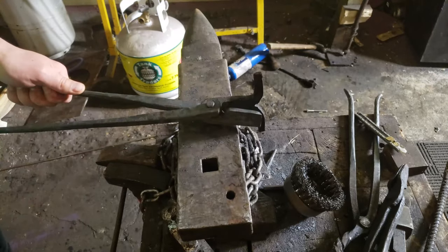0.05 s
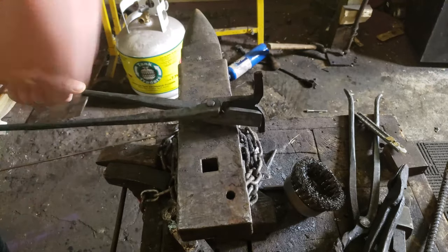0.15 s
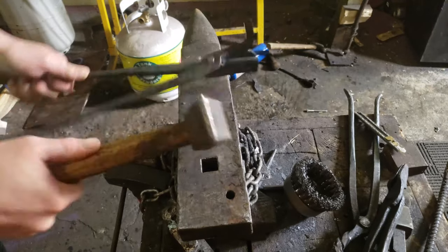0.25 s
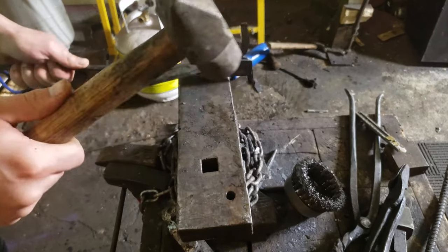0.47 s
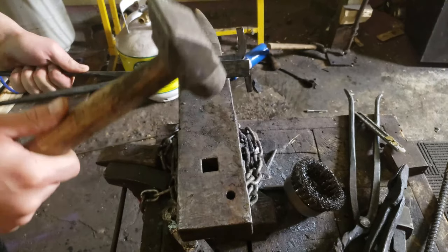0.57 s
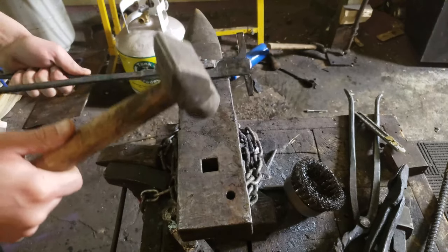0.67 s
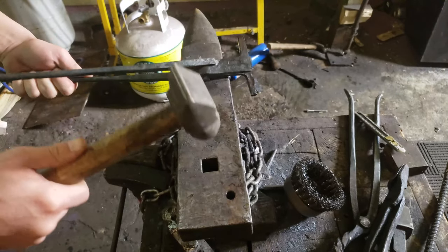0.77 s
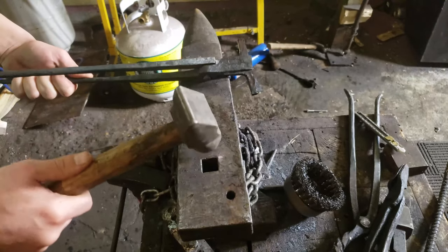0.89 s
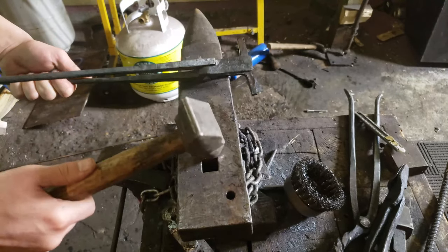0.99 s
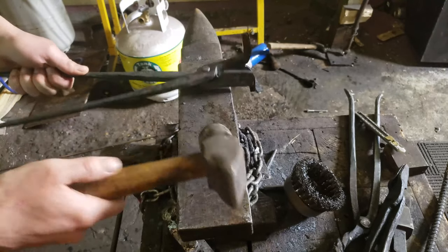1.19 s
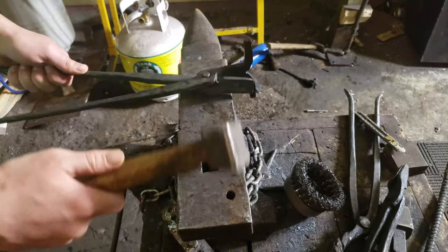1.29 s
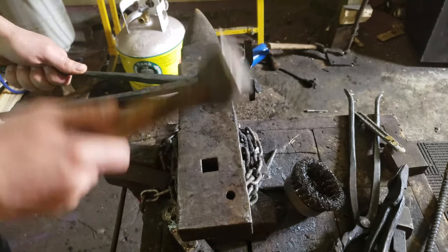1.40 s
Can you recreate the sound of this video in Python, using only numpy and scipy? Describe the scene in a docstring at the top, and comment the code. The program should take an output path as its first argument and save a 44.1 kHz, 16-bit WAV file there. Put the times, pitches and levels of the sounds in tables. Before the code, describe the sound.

One close hammer blow cracks on a steel anvil, which rings high and clatters briefly. After a short pause, the hammer settles on the anvil in light taps that speed up and fade, while the workshop rumbles low.

```python
"""A low rumble fills a workshop, and an anvil still sings high from the blow before.
A smith's hammer hits it once, hard and close: a crack, a thump and ringing steel, then two quick clatters.
A limiter clamps on the blow and holds the level down to the end.
Then the hammer is let down on the anvil's face and bounces to rest in quickening ticks."""
import sys
import numpy as np
from scipy import signal
from scipy.fft import rfft, irfft
from scipy.io import wavfile
from scipy.ndimage import uniform_filter1d

SR = 44100
rng = np.random.default_rng(int(sys.argv[2]) if len(sys.argv) > 2 else 0)


def materialize(psi):
    """Save the field psi as 16-bit PCM at rate SR to the path in sys.argv[1].

    A 1-D psi becomes a single channel; in a 2-D psi each row is a channel.
    """
    bounded = np.clip(np.atleast_2d(psi).T, -1, 1)
    quanta = np.round(bounded * 32767).astype(np.int16)
    wavfile.write(sys.argv[1], SR, quanta)


N = 63945


def amp(db):
    """Decibels to gain."""
    return 10 ** (np.asarray(db) / 20)


def unit_rms(x):
    """Scales to rms 1."""
    return x / np.sqrt(np.mean(x ** 2) + 1e-20)


def curve(table, hz, column=1):
    """Reads one column of a table on a log-frequency axis."""
    columns = np.transpose(table)
    return np.interp(np.log(hz + 1), np.log(columns[0] + 1), columns[column])


def add(mix, start_s, sound):
    """Mixes a sound in at a time."""
    part = mix[:, round(start_s * SR):][:, :sound.shape[-1]]
    part += sound[..., :part.shape[1]]


def pan(db):
    """Stereo gains; positive db leans left."""
    return amp([[db / 2], [-db / 2]])


def ripple(hz, width_hz):
    """Many small resonances: random peaks and dips along frequency."""
    return np.interp(hz / width_hz, np.arange(4096), rng.standard_normal(4096))


def noise(eq, size, ripple_db=0):
    """Two unrelated channels of coloured noise at rms 1."""
    hz = np.fft.rfftfreq(size, 1 / SR)
    gain = amp(curve(eq, hz) + ripple_db * ripple(hz, width_hz=44.35))
    return unit_rms(irfft(rfft(rng.standard_normal((2, size))) * gain, size))


def ring(modes, t, tilt_db=0, tilt_from_hz=1920):
    """Decaying modes; harder or softer contact tilts the highs by tilt_db per octave."""
    hz, db, t60 = np.transpose(modes)[:, :, None]
    phase = np.array([1, -1]) * np.pi / 4 * np.minimum(hz / 5500, 1)  # highs: a quarter cycle of width
    gain = amp(db + tilt_db * np.log2(np.maximum(hz / tilt_from_hz, 1))) * np.exp(1j * phase)
    return (gain.T @ np.exp((2j * np.pi * hz - np.log(1000) / t60) * t)).imag


# Tone of the workshop bed: freq_hz, level_db
RUMBLE_EQ = [(20, -41), (40, -41.5), (58, -3), (85, -3), (120, -30), (170, -1.5), (215, -10.5), (335, 1.5),
             (420, -6), (500, -17), (700, -24.5), (1000, -39), (1230, -25), (1500, -40), (2500, -32.5),
             (3200, -39), (6500, -42), (8800, -53.5), (10000, -46.5), (12600, -42), (15500, -45.5)]
# Its stereo image: freq_hz, correlation, pan_db
RUMBLE_IMAGE = [(60, 0.98, 1), (170, 0.91, 1), (352, 0.74, 3.5), (1000, 0.12, 2), (4000, 0.11, 7.5),
                (11900, 0.046, -2.5)]


def rumble(level_db=-36, flutter_db=2, ripple_db=5):
    """A steady low roar with faint hiss, fluttering in patches."""
    hz = np.fft.rfftfreq(2048, 1 / SR)
    a, b, c, d, flutter = rng.standard_normal((N // 512 + 5, len(hz), 5)).T
    flutter = uniform_filter1d(flutter, size=8, axis=0)  # smooth across frequency
    flutter = unit_rms(uniform_filter1d(flutter, size=6, axis=1))  # and over time
    correlation = np.clip(curve(RUMBLE_IMAGE, hz), -1, 1)[:, None]
    pan_db = curve(RUMBLE_IMAGE, hz, column=2)[:, None]
    left = a + 1j * b
    right = correlation * left + np.sqrt(1 - correlation ** 2) * (c + 1j * d)
    bands = np.array([left * amp(pan_db / 2), right * amp(-pan_db / 2)])
    eq_db = curve(RUMBLE_EQ, hz) + ripple_db * (hz > 450) * ripple(hz, width_hz=40)
    bands *= amp(eq_db[:, None] + flutter_db * flutter)
    return amp(level_db) * unit_rms(signal.istft(bands, nperseg=2048, noverlap=1536)[1][:, :N])


# Reverb time of the workshop: freq_hz, t60_s
ROOM_DECAY = [(200, 0.13), (1500, 0.38), (4000, 0.29), (8000, 0.324), (15000, 0.23)]


def room(send):
    """Sparse reflections, each band dying at its own speed."""
    taps = rng.choice([-1., 1.], (2, SR // 2)) * (rng.random((2, SR // 2)) < .1)
    taps[:, :round(.005 * SR)] = 0  # pre-delay
    hz, t, bands = signal.stft(taps, SR, nperseg=256)
    decay = np.exp(-np.log(1000) * t / curve(ROOM_DECAY, hz)[:, None])
    tail = signal.istft(bands * decay, SR, nperseg=256)[1]
    return signal.fftconvolve(send, tail / np.linalg.norm(tail[0]), axes=1)[:, :N]


# The anvil's high note, three close modes that beat: pitch_hz, level_db, t60_s
SINGING_MODES = [(8358, -11, .24), (8390, -27, .6), (8393.4, -30, .6)]


def anvil_singing(earlier_s=0.21):
    """The high note lingers from the blow before and is struck afresh."""
    t = np.arange(N) / SR
    out = amp(-9) * ring(SINGING_MODES, t + earlier_s) * pan(1.7)
    add(out, HARD_HITS[0][0], amp(3.5) * ring(SINGING_MODES, t))
    return out


# Clack of the hammer against the face, in bounces and hard hits: pitch_hz, level_db, t60_s
HAMMER_MODES = [(747, -7, 0.038), (1439, -4.5, 0.019), (1602, 5, 0.019), (1690.5, -12.5, 0.13),
                (2556, 0, 0.048), (2644, -4.5, 0.024), (3514, -13.5, 0.024), (5075, -17.5, 0.022),
                (6010, -17, .025), (8760, -36.5, .05)]
# Tone of a light tick: freq_hz, level_db
TICK_EQ = [(200, 8.5), (700, 7.5), (1100, 5.5), (1600, 13), (2800, 1.5), (4000, -8), (7500, -10.5),
           (9000, -16.5), (12500, -14), (15500, -11)]
# The hammer settling: start_s, level_db, tick_trim_db, tilt_db_per_octave
BOUNCE_HITS = [(0.8551, -0.5, 0.5, 3.5), (0.9515, -1.5, -3, 0.5), (1.0018, -4.5, -1, -7.5),
               (1.0347, -6, 1.5, -10), (1.0577, -11, 4, -9), (1.0735, -7.5, -4.5, -26),
               (1.086, -11, -2, -10.5), (1.093, -23, -22, -23)]


def hammer_bounces(attack_s=0.0014, tick_decay_s=0.0019, reverb_db=-9):
    """The hammer drops on the face and bounces ever faster as it fades."""
    t, out = np.arange(SR // 10) / SR, np.zeros((2, N))
    for start_s, level_db, trim_db, tilt_db in BOUNCE_HITS:
        tick = amp(trim_db - 13.5) * np.exp(-t / tick_decay_s) * noise(TICK_EQ, len(t))
        clack = amp(-21.5) * ring(HAMMER_MODES, t, tilt_db)
        add(out, start_s, amp(level_db) * np.minimum(t / attack_s, 1) * (tick + clack))
    return pan(7) * (out + amp(reverb_db) * room(out))


# Knock of the anvil's stand: pitch_hz, level_db, t60_s
STAND_MODES = [(779, 10, 0.019), (338, -8.5, 0.098), (139, -8.5, 0.033)]


def thump(push_delay_s=0.0013, push_s=0.00049, swing_hz=53, swing_s=0.029):
    """The blow knocks the stand and throws a push of air that swings the near microphone."""
    t, out = np.arange(SR // 10) / SR, np.zeros((2, N))
    push = amp(22) * np.exp(-((t - push_delay_s) / push_s) ** 2)
    swing = -amp(4) * np.sin(2 * np.pi * swing_hz * t) * np.exp(-(t / swing_s) ** 4)
    air = (push + swing) * np.array([[1], [-.17]])  # weak and inverted on the right
    knock = amp(-6) * pan(10.5) * ring(STAND_MODES, t)
    add(out, HARD_HITS[0][0], air + knock)
    return out


# Ring of the anvil's body: pitch_hz, level_db, t60_s
ANVIL_MODES = [(1497, -23, .25), (1898, -26, .22), (2526, -24, .3), (3735, -27, .22), (4337, -19, .24),
               (4447, -24, .22), (7217, -24, .24), (7653, -25, .22), (9458, -29, .26), (12284, -31, .34),
               (14970, -22, .15), (15260, -15, .08)]
# Tone of the crack and the jangle: freq_hz, level_db
CRACK_EQ = [(100, -0.5), (400, 7.5), (800, -0.5), (1100, -0.5), (2400, 2), (3100, 0), (4400, 4),
            (6200, -2.5), (7600, 4), (9000, -1.5), (12500, -2.5), (13800, -3), (15300, 0)]
# The blow and its two clatters: start_s, crack_db, ring_db, clack_db, pan_db
HARD_HITS = [(0.2316, 6.5, -3, -10.5, 4), (0.2625, -13.5, -15, -1.5, 7), (0.2918, -8.5, -22.5, -28, 3)]


def hammer_blow(attack_s=0.00048, crack_decay_s=0.0034, jangle_t60_s=0.36, reverb_db=-7.5):
    """Each hard contact cracks, rings anvil and hammer, and sets tongs, chain and loose steel jangling."""
    t, hits, tails = np.arange(SR // 2) / SR, np.zeros((2, N)), np.zeros((2, N))
    jangle_decay = np.exp(-np.log(1000) * t / jangle_t60_s)
    for start_s, crack_db, ring_db, clack_db, pan_db in HARD_HITS:
        crack = amp(crack_db + 1.5) * np.exp(-t / crack_decay_s) * noise(CRACK_EQ, len(t))
        jangle = amp(crack_db - 22) * jangle_decay * noise(CRACK_EQ, len(t), ripple_db=5)
        clack = amp(clack_db - 12.5) * ring(HAMMER_MODES, t, tilt_db=14.5)
        anvil = amp(ring_db) * ring(ANVIL_MODES, t)
        add(hits, start_s, pan(pan_db) * np.minimum(t / attack_s, 1) * (crack + clack))
        add(tails, start_s, pan(pan_db) * (anvil + jangle))
    return hits + amp(reverb_db) * room(hits) + tails


def scene():
    """Hammer and anvil over the workshop bed, in stereo."""
    return hammer_blow() + anvil_singing() + thump() + hammer_bounces() + rumble()


def record(dry, threshold_db=-21, max_hold_db=9.5, release_db_per_s=0.5, detect_s=0.003):
    """A treble-keyed limiter clamps on the blow and holds part of its cut; then clipping and a low-pass."""
    sidechain = signal.sosfilt(signal.butter(2, 1000, "high", fs=SR, output="sos"), dry)
    power = abs(uniform_filter1d((sidechain ** 2).mean(0), round(detect_s * SR)))
    over_db = np.maximum(10 * np.log10(power + 1e-12) - threshold_db, 0)
    release_db = release_db_per_s * np.arange(N) / SR
    held_db = np.maximum.accumulate(np.minimum(over_db, max_hold_db) + release_db) - release_db
    cut_db = np.maximum(held_db, 0.82 * over_db)
    clipped = np.clip(dry * amp(-cut_db), -1, 1)
    lowpass = signal.firwin(255, 15900, window=("kaiser", 9), fs=SR)
    return signal.oaconvolve(clipped, lowpass[None], "same")


dry = scene()
out = record(dry)
materialize(out)
```